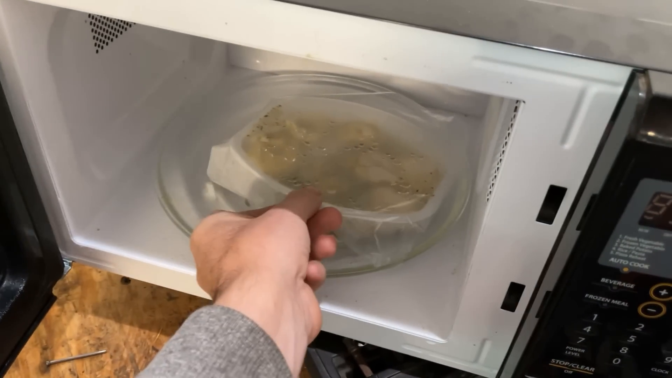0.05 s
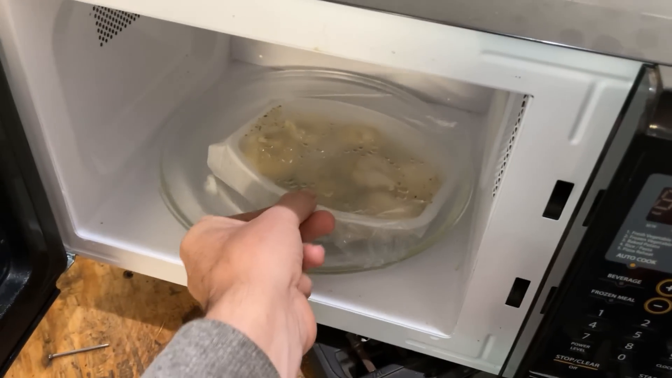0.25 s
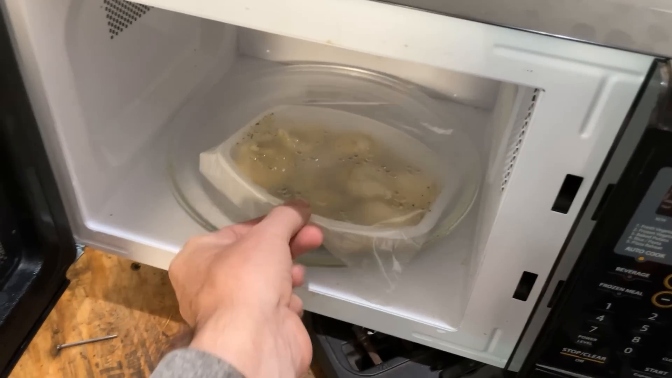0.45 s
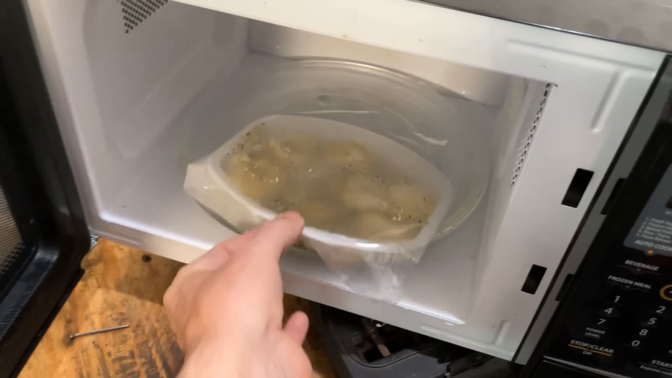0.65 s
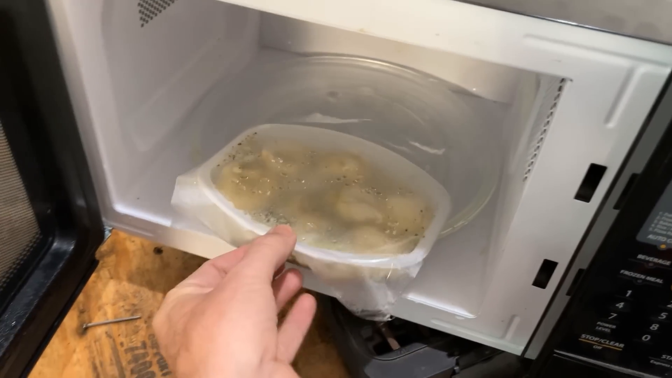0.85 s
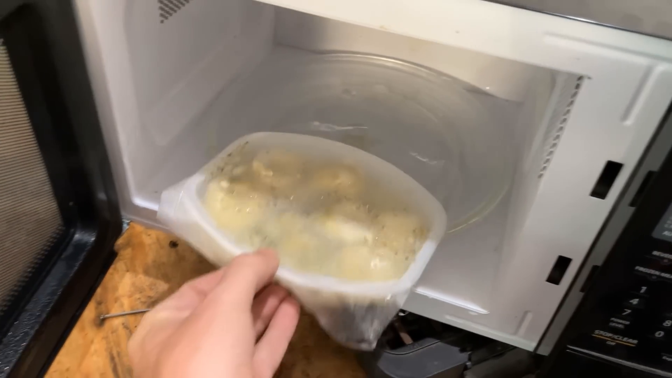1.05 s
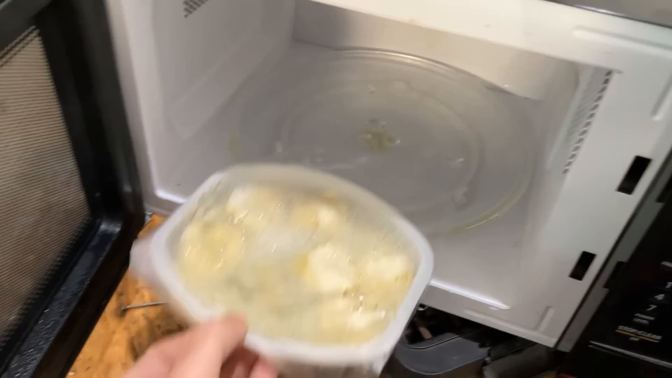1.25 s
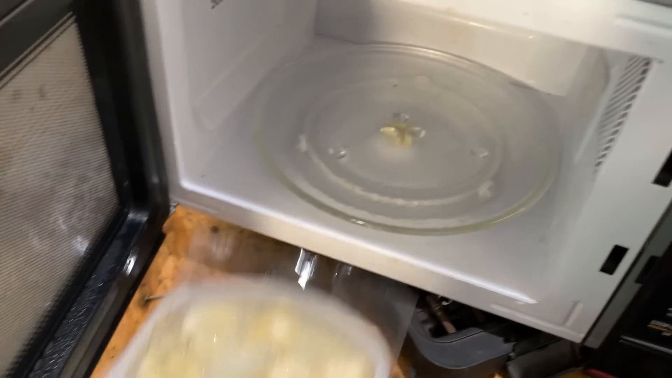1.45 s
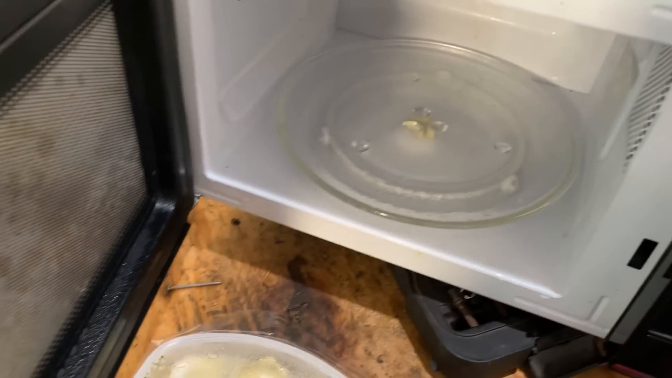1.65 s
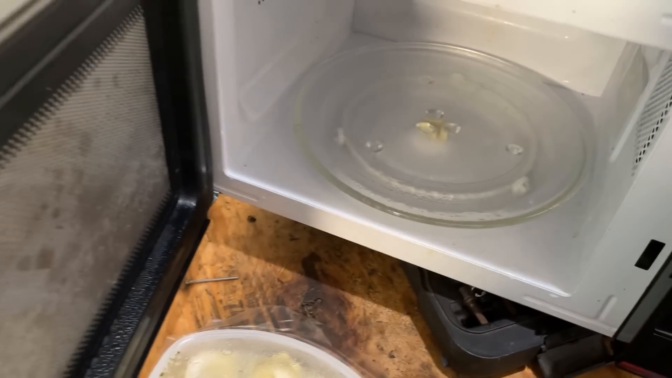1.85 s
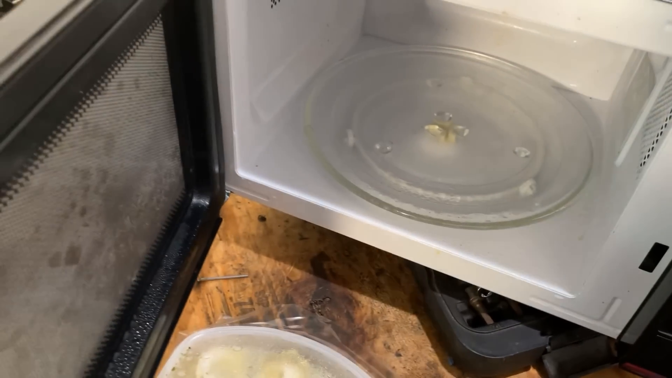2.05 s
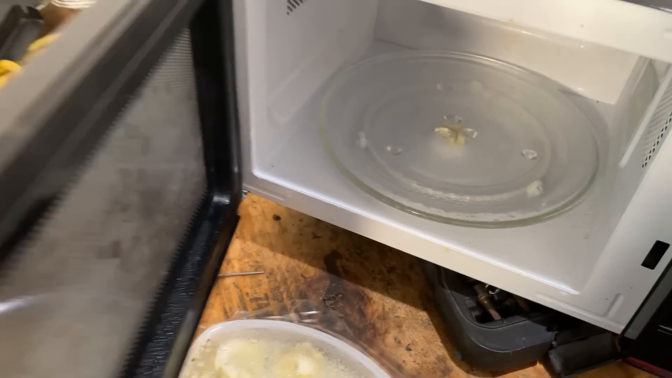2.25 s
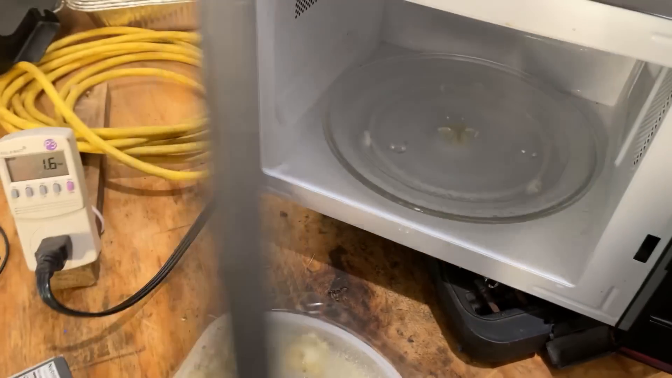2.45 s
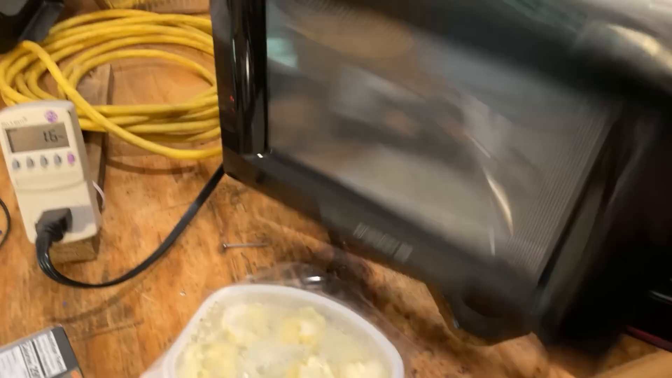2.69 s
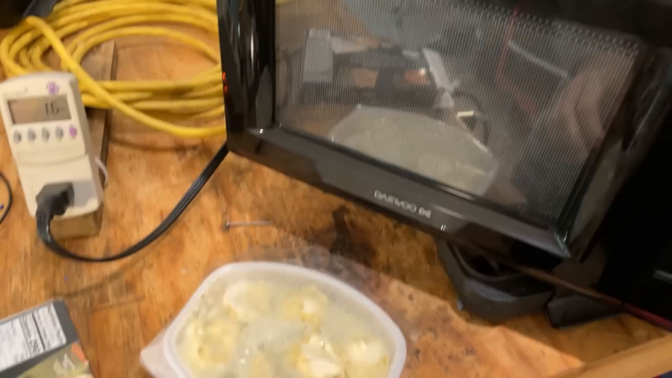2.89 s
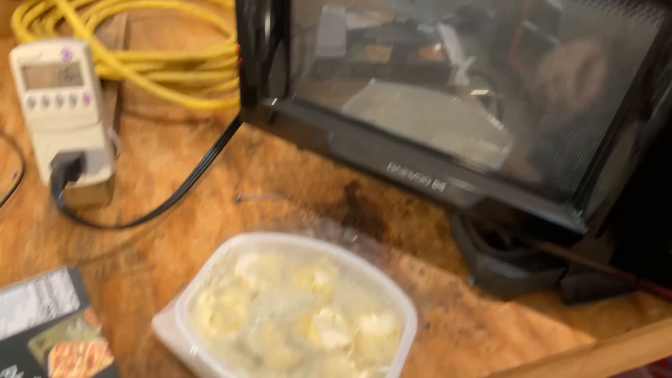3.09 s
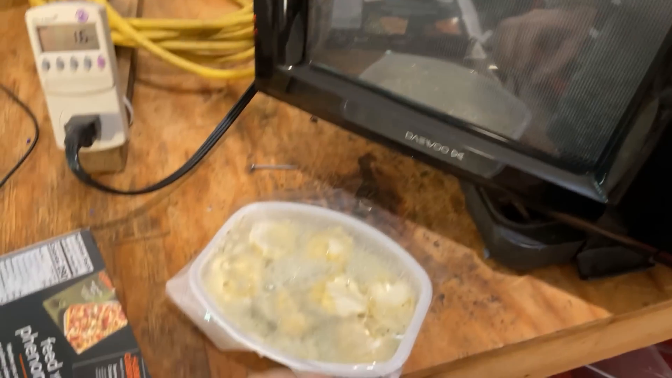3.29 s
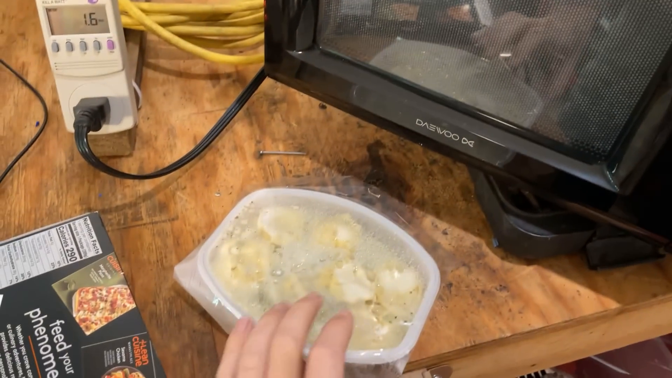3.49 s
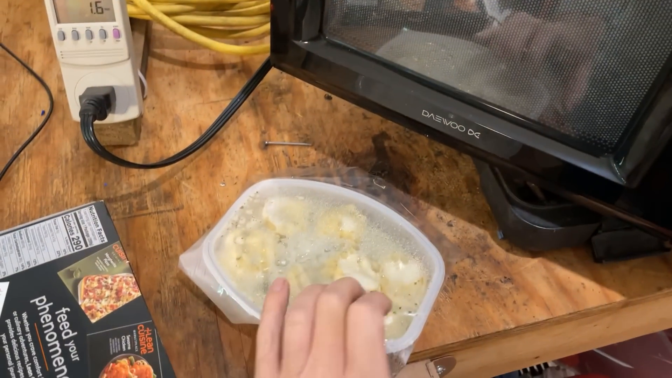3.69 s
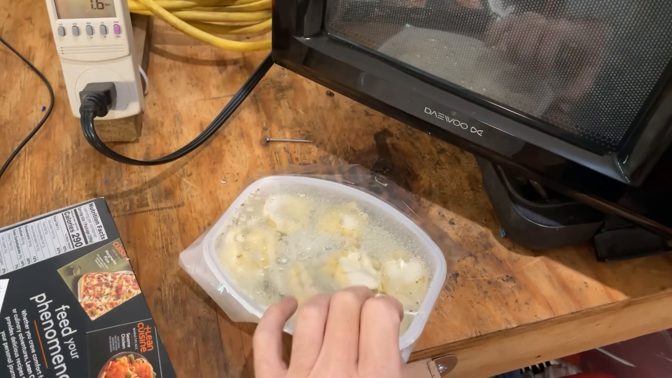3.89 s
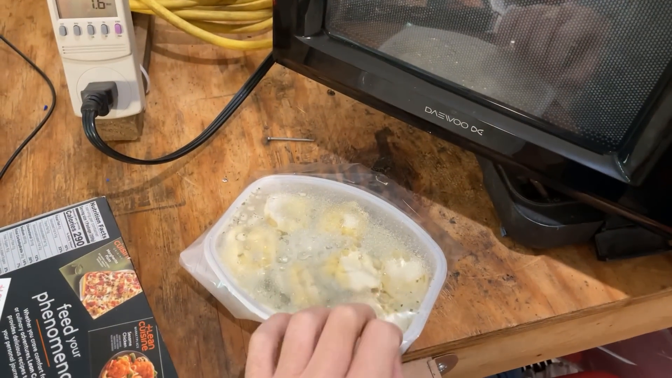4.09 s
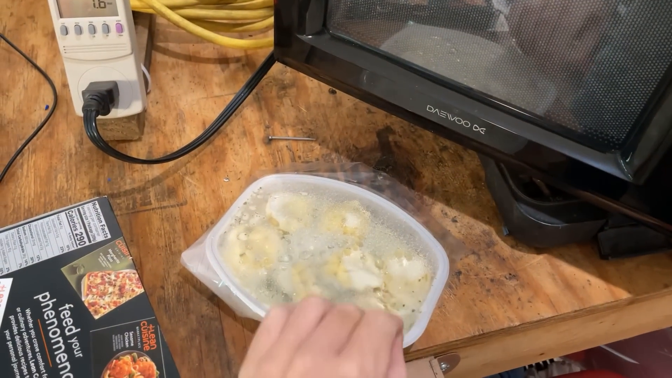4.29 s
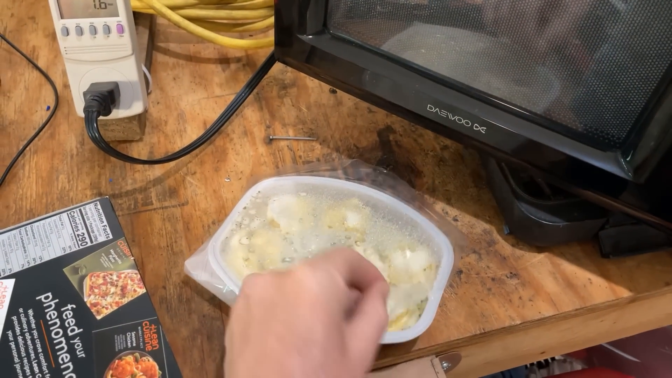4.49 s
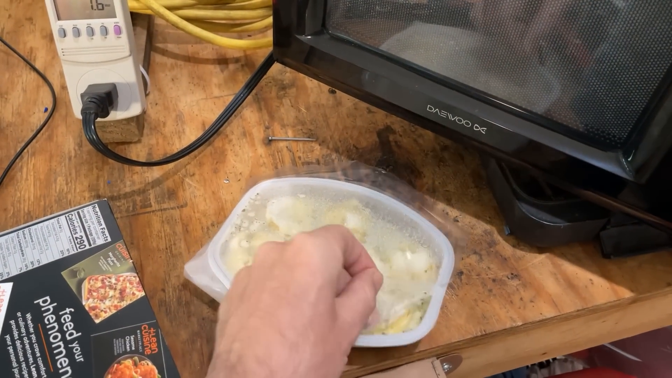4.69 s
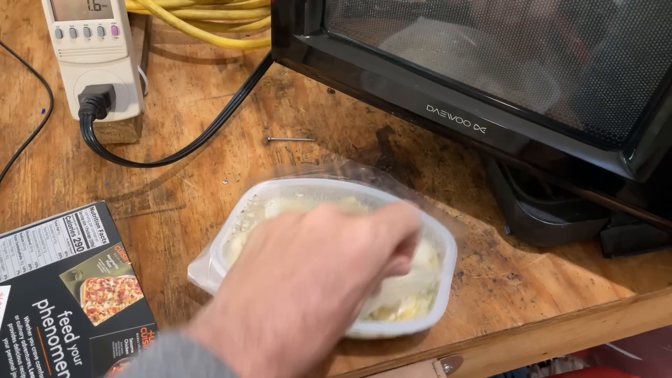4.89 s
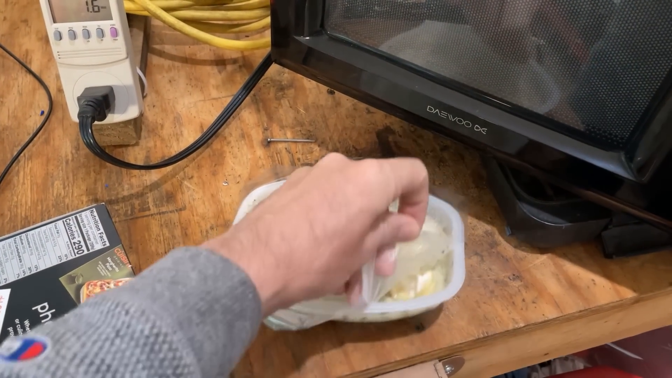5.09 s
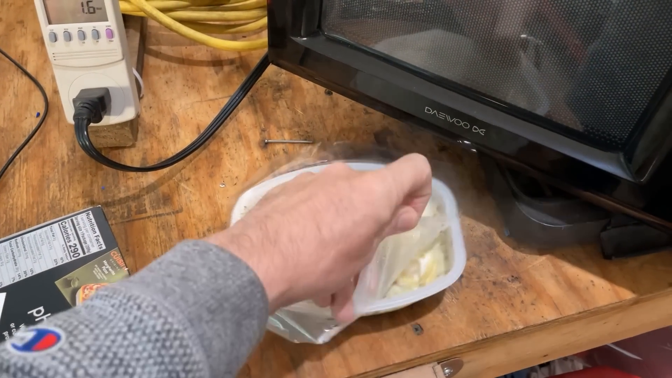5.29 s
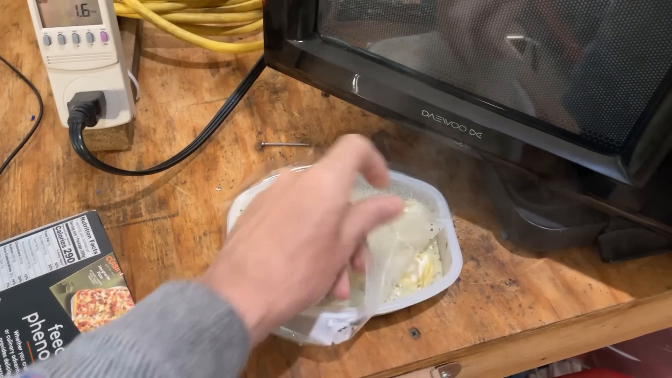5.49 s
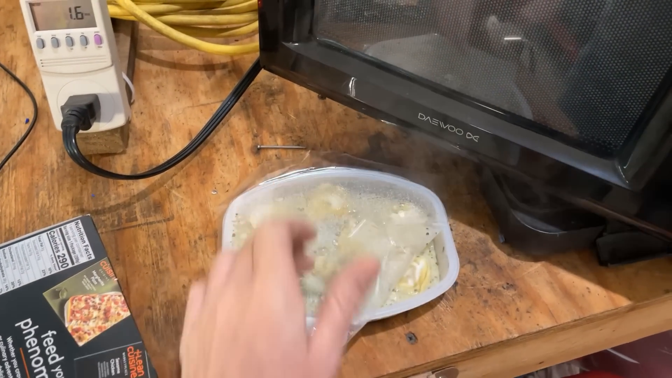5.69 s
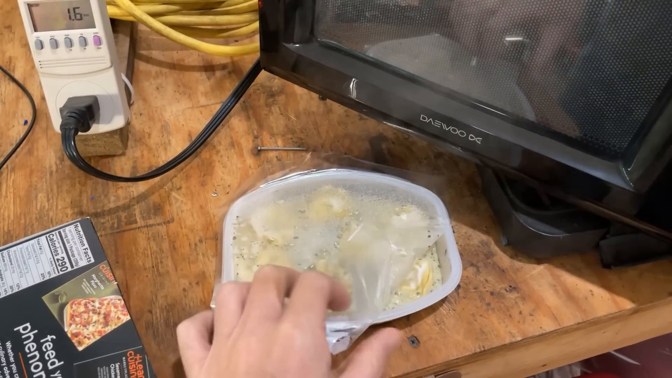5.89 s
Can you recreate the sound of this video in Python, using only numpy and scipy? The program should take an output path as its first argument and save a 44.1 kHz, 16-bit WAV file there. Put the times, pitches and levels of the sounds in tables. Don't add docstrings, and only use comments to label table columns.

```python
import sys
import numpy as np
from scipy import signal
from scipy.fft import rfft, irfft, next_fast_len
from scipy.io import wavfile
from scipy.ndimage import map_coordinates

SR = 44100
rng = np.random.default_rng(int(sys.argv[2]) if len(sys.argv) > 2 else 0)


def transcribe(u):
    v = np.clip(np.atleast_2d(u).T, -1, 1)
    q = np.round(v * 32767).astype(np.int16)
    wavfile.write(sys.argv[1], SR, q)


def makeup_ratio(level_db):
    decades = np.asarray(level_db, float) / 20
    return 10 ** decades


N = 261839
TIME = np.arange(N) / SR

# start in seconds, clatter level in dB, thump level in dB, clatter t60 in seconds.
DOOR_HITS = [
    (2.7633, -22.5, -52, .09),
    (2.775, -18, -33.5, 0.046),
    (2.7818, -8.5, -9, 0.054),
    (2.7902, -10, -22.5, 0.033),
    (2.798, -9.5, -24, 0.048),
    (2.808, -16, -16, 0.071),
    (2.816, -18.5, -20.5, 0.041),
    (2.83, -20.5, -20.5, 0.18),
]
# frequency in Hz, level in dB per Hz.
CLATTER_COLOR = [(200, -40.5), (380, -21.5), (520, -9), (680, -11), (800, -6), (1050, -11.5), (1750, -17),
                 (5000, -21.5), (12000, -33.5), (15800, -45.5)]
# frequency in Hz, level in dB, t60 in seconds.
STEEL_BOX = [(62, -23, 0.41), (88, -4.5, 0.99), (119, -2, 0.58), (164, 0, 0.46), (168, -7.5, 0.23),
             (252, 1, 0.4), (260, -2, 0.4), (294, -2, 0.67), (324, -1, 0.44), (380, -11.5, 0.99),
             (466, -13, 0.49), (546.7, -7.5, 0.45), (629, 2, .35), (784, -3.5, 0.3), (715, -9, .35),
             (1030, -3, 0.24), (1048, -19.5, .4), (1221, -13.5, .3), (1471, -17, .3)]
# first tick in seconds, period in seconds.
HINGE = (1.8642, .13002)
# start in seconds, frequency in Hz, level in dB, t60 in seconds.
BOX_ROCKS = [(2.22, 62, -45, 0.29), (2.272, 118.1, -45, .6), (2.36, 36, -40, .2), (2.655, 49.48, -40, 0.14)]
# start in seconds, frequency in Hz, level in dB, t60 in seconds.
SQUEAK = (2.7, 5070, -50, .11)
# start in seconds, frequency in Hz, level in dB, t60 in seconds.
PANEL_FLEXES = [(2.7842, 241, -8.5, 0.2), (2.7838, 160, -12.5, 0.16), (2.783, 87, -13.5, .3),
                (2.806, 188, -17.5, 0.1), (2.822, 317.4, -10.5, 0.095)]
# frequency in Hz, level in dB, t60 in seconds.
GLASS_PLATE = [(2406, -57, 1.3), (3063, -57, 1.4), (3386, -60, 1.7), (4274, -53.5, 1.3), (5560, -63, 1.2)]
# frequency in Hz, width in Hz, level in dB.
BOOM = [(78, 14, -2), (116, 23, -5), (157, 27, 0), (246, 46, -1.5), (300, 32, -4.5), (386, 44, -6),
        (450, 65, -7)]
# start in seconds, rattle level in dB, thud level in dB, rattle t60 in seconds.
KNOCKS = [(0.0799, -37, -43.5, 0.045), (0.136, -59, -50, 0.33), (.545, -68, -55, 0.17),
          (1.5439, -30.5, -35.5, 0.049), (1.557, -37.5, -27.5, 0.25), (1.605, -52, -51, 0.08),
          (4.34, -55, -44.5, 0.17), (5.011, -46, -64, 0.073), (5.47, -35.5, -43, 0.039),
          (5.481, -43, -44.5, 0.17)]
# frequency in Hz, level in dB per Hz.
RATTLE_COLOR = [(88, -7), (150, -2), (438, -8.5), (686, -4.5), (801, -10.5), (1380, -9), (2480, -16.5),
                (4630, -19), (15800, -38)]
# frequency in Hz, width in Hz, level in dB.
BENCH = [(95.1, 22, -7), (435, 54, -6.5), (1002, 20, -2), (1330, 37, -22), (2030, 25, -28),
         (2220, 47, 19.5), (2950, 31, -15)]
# start in seconds, end in seconds, frequency in Hz,
# width in Hz, level in dB.
SCRAPES = [(0.114, 0.194, 1070, 530, -57.5), (0.34, 0.354, 1000, 460, -64),
           (0.42, 0.586, 1170, 1000, -66.5), (0.54, 0.575, 640, 380, -64.5),
           (4.212, 4.233, 1610, 360, -61.5), (5.468, 5.52, 2500, 2400, -49.5),
           (5.719, 5.858, 1150, 170, -64.5), (3.2, 14, 520, 370, -67), (2.535, 2.6, 9500, 8000, -76.5),
           (3.934, 4.3, 2530, 290, -71.5), (3.42, 3.83, 1300, 550, -70.5), (4.3, 3.8, 260, 120, -60.5),
           (3.63, 3.66, 1400, 120, -65), (3.705, 3.73, 1260, 150, -67), (5.202, 5.216, 2950, 600, -54),
           (1.24, 1.4, 3300, 300, -75)]
# start in seconds, hold in seconds,
# crinkle level in dB, brightness in dB.
LIFTS = [(0.08, 0.011, -53, -6), (0.12, 0.039, -73, -12), (0.236, 0.014, -65.5, -3),
         (0.37, 0.056, -73.5, 0.5), (0.43, 0.18, -73, 1.5), (0.972, .01, -76, -6), (1.076, .005, -80, 16),
         (1.27, .05, -66.5, -10.5), (1.353, 0.028, -62.5, -1), (1.445, 0.038, -62.5, -4.5),
         (1.546, 0.046, -53, -9), (1.72, 0.079, -62, -2)]
# start in seconds, hold in seconds, crinkle level in dB, brightness in dB.
PEELS = [(3.893, .1, -71.5, -1), (3.998, 0.058, -63.5, -1.5), (4.08, .06, -65, 0.5),
         (4.152, 0.098, -62, 1.5), (4.292, 0.051, -49.5, -1), (4.416, 0.033, -59.5, -1.5),
         (4.48, 0.063, -67, -4), (4.604, 0.022, -58, 6.5), (4.686, 0.15, -58.5, -6),
         (4.847, 0.086, -55.5, 1), (4.949, 0.049, -56.5, -4.5), (5.008, 0.018, -49, -6),
         (5.074, 0.093, -61, -1), (5.222, .03, -55, -3), (5.157, 0.017, -60.5, 0.5),
         (5.277, .03, -55.5, -7), (5.354, 0.075, -50.5, -4), (5.458, 0.02, -51.5, -18),
         (5.737, 0.027, -62, -18.5), (5.847, .08, -67.5, -25)]
# start in seconds, peak level in dB, pitch in Hz.
PEEL_SNAPS = [(3.9421, -53, 2630), (3.9826, -53.5, 2550), (4.017, -46, 5000), (4.0369, -42, 5120),
              (4.0513, -46, 5020), (4.0898, -47, 6200), (4.1631, -40.5, 5240), (4.2044, -47, 7300),
              (5.0088, -38, 5500), (4.2986, -31.5, 5680), (4.3407, -33, 4010), (4.419, -39, 3160),
              (4.4974, -44, 3130), (4.6081, -39, 4000), (4.6195, -42, 4040), (4.7506, -40, 4100),
              (4.8067, -41, 4200), (4.8436, -37, 4000), (4.859, -33.5, 4700), (4.9076, -37.5, 4450),
              (4.9527, -39, 5560), (5.0161, -30, 4890), (5.1609, -41.5, 4770), (5.192, -34, 2860),
              (5.223, -35, 5360), (5.2315, -33, 4830), (5.2859, -40, 4760), (5.3513, -39, 5000),
              (5.459, -41.5, 4920), (5.736, -47, 3840)]
# start in seconds, peak level in dB, pitch in Hz.
LIFT_SNAPS = [(0.0543, -54, 3360), (0.1221, -52.5, 3150), (0.9472, -55, 3920), (0.972, -38.5, 4300),
              (1.075, -50, 14500), (1.272, -47.5, 4060), (1.3526, -39, 4060), (1.3844, -62, 3800),
              (1.73, -50, 3100), (1.7544, -47, 5390)]
# frequency in Hz, level in dB per Hz.
FILM_COLOR = [(410, -12.5), (700, 4.5), (798, 2), (1360, -2.5), (1790, 0), (4820, -2.5), (8230, -6.5),
              (11400, -13), (15800, -28.5)]
# frequency in Hz, t60 in seconds.
ROOM_DECAY = [(60, .9), (250, 0.94), (600, 0.67), (2000, 0.59), (5000, 0.52), (9000, 0.46), (15000, .22)]
# frequency in Hz, level in dB rms.
MOTOR = (99, -60.5)
# frequency in Hz, level in dB rms.
WHINE = (2853, -85)
# frequency in Hz, width in Hz, level in dB rms.
FAN = [(118.1, 5.3, -67.5), (200, 29, -69.5), (294.8, 18, -78.5), (451.4, 14, -76), (1350, 490, -77.5),
       (5600, 14, -93.5)]
# frequency in Hz, level in dB per Hz.
HUSH_COLOR = [(15, -18), (28, -1.5), (45, -6.5), (70, -7), (110, -4.5), (170, -8.5), (260, -10),
              (460, -14.5), (700, -18), (1280, -23), (1930, -29.5), (3000, -43), (5000, -60)]
# frequency in Hz, level in dB per Hz.
HISS_COLOR = [(800, -18.5), (2000, -0.5), (3500, -1), (7000, -4.5), (8500, -9), (15800, -16.5)]


def unit(x):
    return x / np.sqrt(np.mean(x ** 2) + 1e-20)


def along(points, hz):
    f, v = np.transpose(points)
    return np.interp(np.log(hz + 1), np.log(f + 1), v)


def filtered(x, response):
    m = next_fast_len(N + SR // 2)
    return irfft(rfft(x, m) * response(np.fft.rfftfreq(m, 1 / SR)), m)[:N]


def noise(color):
    return unit(filtered(rng.standard_normal(N), lambda hz: makeup_ratio(along(color, hz))))


def wobble(rate):
    coarse = TIME[::32]
    knots = rng.standard_normal(int(N * rate / SR) + 4)
    return np.interp(TIME, coarse, map_coordinates(knots, [coarse * rate]))


def decay(start, t60, rise):
    t = np.maximum(TIME - start, 0)
    fall = np.log(1000) * t / t60
    return np.exp(-fall) - np.exp(-fall - t / rise)


def ring(start, hz, db, t60, rise=.001):
    return makeup_ratio(db) * decay(start, t60, rise) * np.sin(2 * np.pi * hz * (TIME - start))


def resonances(f, peaks):
    total = 0
    for k, (center, width, db) in enumerate(peaks):
        total = total + (-1) ** k * makeup_ratio(db) * 1j * f * width / (center * center - f * f + 1j * f * width)
    return total


def blows(rows, width):
    x = np.zeros(N)
    for start, db in rows:
        x[round(start * SR)] = makeup_ratio(db)
    push = np.hanning(int(width * SR) + 3)
    return np.convolve(x, push / push.sum())[:N]


def door():
    rattling = sum(makeup_ratio(db) * decay(start, t60, 0.0018) for start, db, _, t60 in DOOR_HITS)
    clatter = noise(CLATTER_COLOR) * rattling
    t = np.arange(SR) / SR
    steel = sum(makeup_ratio(db - 60 * t / (0.21 * t60)) * np.cos(2 * np.pi * hz * t) for hz, db, t60 in STEEL_BOX)
    push = blows([(start, db - 7.5) for start, _, db, _ in DOOR_HITS], .0014)
    thump = -signal.fftconvolve(push, steel)[:N]
    first = DOOR_HITS[0][0]
    hooks = ring(first, 480, -25, .08) + ring(first, 900, -35.0, .06)
    return clatter + thump + hooks


def ringing():
    slam = DOOR_HITS[2][0]
    rumble = unit(filtered(rng.standard_normal(N), lambda f: resonances(f, BOOM) ** 2))
    boom = makeup_ratio(-29) * decay(slam, 1.7, .02) * rumble
    panel = sum(ring(*flex, rise=0.0035) for flex in PANEL_FLEXES)
    plate = sum(makeup_ratio(2 * wobble(22)) * ring(slam, *note, rise=.12) for note in GLASS_PLATE)
    return ring(*SQUEAK, rise=0.022) + panel + plate + boom


def swing():
    start, period = HINGE
    ticks = blows([(start + k * period, -34.5 + rng.normal(0, .7)) for k in range(7)], .0001)
    ticks = filtered(ticks, lambda f: resonances(f, [(700, 1400, 7), (4000, 12000, -3)]))
    return ticks + sum(ring(*rock, rise=0.012) for rock in BOX_ROCKS)


def tray():
    rattling = sum(makeup_ratio(db) * decay(start, t60, 0.0015) for start, db, _, t60 in KNOCKS)
    rattle = noise(RATTLE_COLOR) * rattling
    push = blows([(start, db + 45) for start, _, db, _ in KNOCKS], 0.001)
    return rattle + filtered(push, lambda f: resonances(f, BENCH))


def scrapes():
    x = np.zeros(N)
    for start, end, hz, width, db in SCRAPES:
        span = slice(round(start * SR), round(end * SR))
        stroke = np.sqrt(np.abs(np.sin(np.pi * (TIME[span] - start) / (end - start))))
        uneven = makeup_ratio(db + 1.9 * wobble(70)[span])
        b, a = signal.iirpeak(hz, hz / width, SR)
        rub = signal.lfilter(b, a, rng.standard_normal(N)[span])
        x[span] += uneven * stroke * unit(signal.lfilter(b, a, rub))
    return x


def film():
    crinkle, bright = handling(LIFTS + PEELS)
    clumps = makeup_ratio(7.5 * wobble(130))
    body = creases(clumps, count=10000, center_hz=4240, spread=0.354) + 0.68 * noise(FILM_COLOR)
    sheen = creases(clumps, count=16000, center_hz=10500, spread=0.14)
    sheen = filtered(sheen, lambda hz: hz ** 2 / (hz ** 2 + 7000 ** 2))
    return makeup_ratio(-3.5) * (crinkle * body + .8 * bright * sheen) + snaps()


def handling(moves):
    grab_s, settle_t60_s = 0.0046, 0.25
    crinkle, sheen = np.zeros(N), np.zeros(N)
    for start, hold, db, bright_db in moves:
        span = slice(round(start * SR), round(start * SR) + SR)
        t = np.abs(TIME[span] - start)
        settling = makeup_ratio(db - 60 * np.maximum(t - hold, 0) / settle_t60_s)
        shape = (1 - np.exp(-t / grab_s)) * settling
        crinkle[span] += shape
        sheen[span] += makeup_ratio(bright_db) * shape
    return crinkle, sheen


def creases(clumps, count, center_hz, spread):
    chance = np.cumsum(clumps)
    at = np.searchsorted(chance, rng.random(count) * chance[-1]).clip(0, N - 1)
    drift = .13 * wobble(14)[at]
    hz = center_hz * np.exp(spread * rng.standard_normal(count) + drift)
    hz = np.clip(hz, 1900, 15000)[:, None]
    size = makeup_ratio(np.minimum(3.5 * rng.exponential(size=count), 9))[:, None]
    k = np.arange(64)
    grains = size * np.exp(-k * hz / (SR * 1.6)) * np.sin(2 * np.pi * hz * k / SR)
    return unit(np.bincount((at[:, None] + k).ravel(), grains.ravel(), N)[:N])


def snaps():
    t = np.arange(SR // 10) / SR
    fade = makeup_ratio(-60 * t / 0.0062) + 0.29 * makeup_ratio(-60 * t / 0.16)
    x = np.zeros(N + len(t))
    for start, db, hz in PEEL_SNAPS + LIFT_SNAPS:
        pitched = ([hz / 1.23, min(hz * 1.47, 19000)], db - 5.5)
        crackle = ([8000, 15000], db - 15)
        for band, peak_db in (pitched, crackle):
            b, a = signal.butter(3, band, "band", fs=SR)
            burst = signal.lfilter(b, a, rng.standard_normal(len(t)) * fade)
            x[round(start * SR):][:len(t)] += makeup_ratio(peak_db) * burst / np.abs(burst).max()
    return x[:N]


def room(x):
    hz, _, z = signal.stft(rng.standard_normal(int(1.3 * SR)), SR, nperseg=512)
    t = _
    fading = z * makeup_ratio(-60 * t / along(ROOM_DECAY, hz)[:, None])
    tail = signal.istft(fading, SR, nperseg=512)[1]
    late = np.pad(x, (220, 0))
    return signal.fftconvolve(late, tail / np.linalg.norm(tail))[:N]


def fan_lines(f):
    total = 0
    for center, width, db in FAN:
        level = makeup_ratio(db) * np.sqrt(2 * SR / (np.pi * width))
        total = total + level * resonances(f, [(center, width, 0)]) ** 2
    return total


def background():
    hz, db = MOTOR
    motor_level = makeup_ratio(db + 2.5 + 2.2 * wobble(30))
    motor = motor_level * np.sin(2 * np.pi * np.cumsum(hz + 2.9 * wobble(14)) / SR)
    hz, db = WHINE
    passing = 6.8 * np.exp(-((TIME - 2.1) / .2) ** 2)
    whine = makeup_ratio(db + 2.5 * wobble(8.2) + passing) * np.sin(2 * np.pi * hz * TIME)
    fan = filtered(rng.standard_normal(N), fan_lines)
    hush_level = makeup_ratio(-61.5 + 1.5 + 1.8 * wobble(3) + 0.65 * wobble(14))
    return motor + whine + fan + hush_level * noise(HUSH_COLOR) + makeup_ratio(-74.5) * noise(HISS_COLOR)


def scene():
    slam = door()
    knocks = tray() + scrapes()
    crinkles = film()
    steady = swing() + ringing() + background()
    far = makeup_ratio(-9) * room(slam) + makeup_ratio(-10) * room(knocks) + makeup_ratio(-9) * room(crinkles)
    return (slam + knocks + crinkles + far + steady)[None]


def roll_off(x):
    return signal.sosfilt(signal.butter(12, 16480, fs=SR, output="sos"), x)


def record(dry):
    mic = filtered(dry[0], lambda hz: (1j * hz / (1j * hz + 45)) ** 2)
    soft = mic / (1 + np.abs(mic / .99) ** 6) ** (1 / 6)
    mix = filtered(soft, lambda hz: np.where(hz < 15830, 1, makeup_ratio(-33.5)))[None]
    return roll_off(mix)


dry = scene()
out = record(dry)
transcribe(out)
```